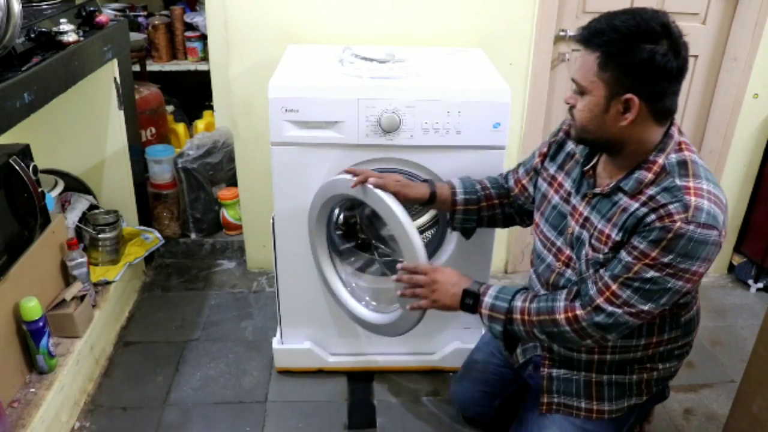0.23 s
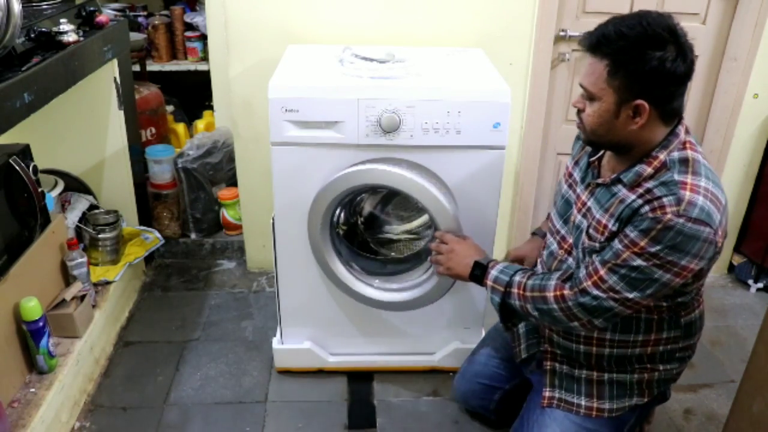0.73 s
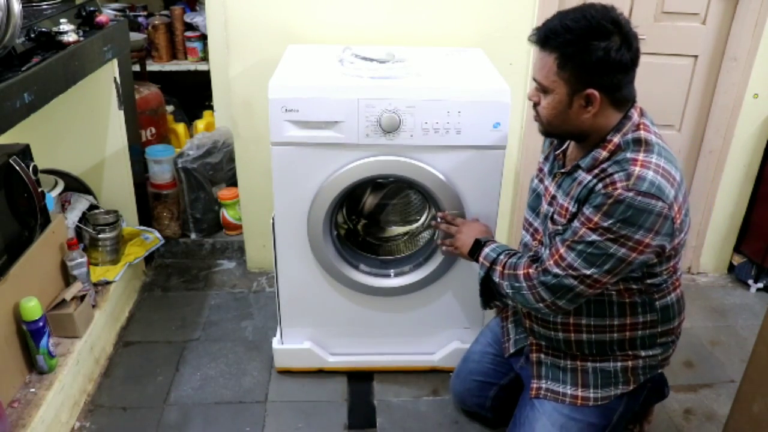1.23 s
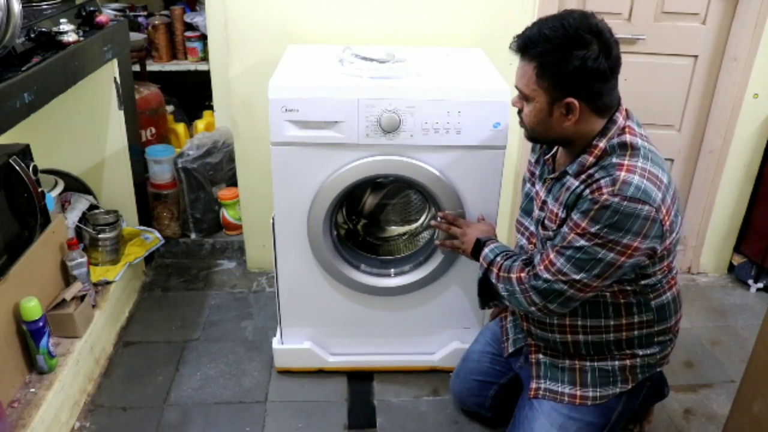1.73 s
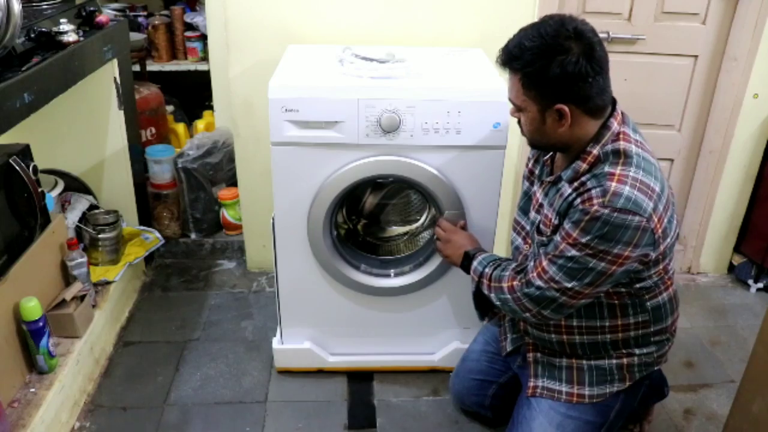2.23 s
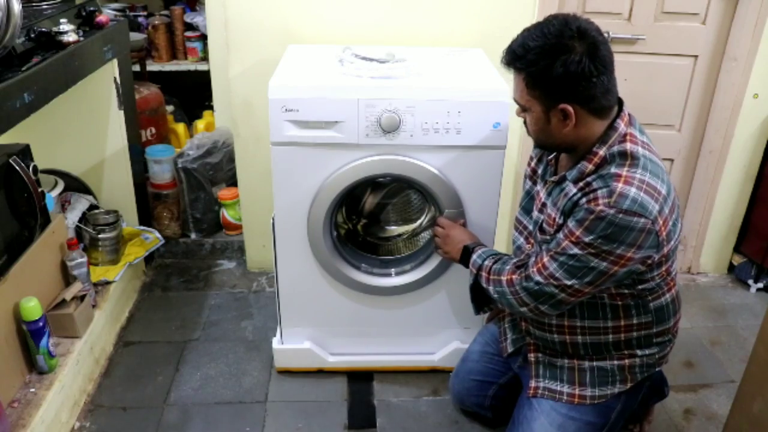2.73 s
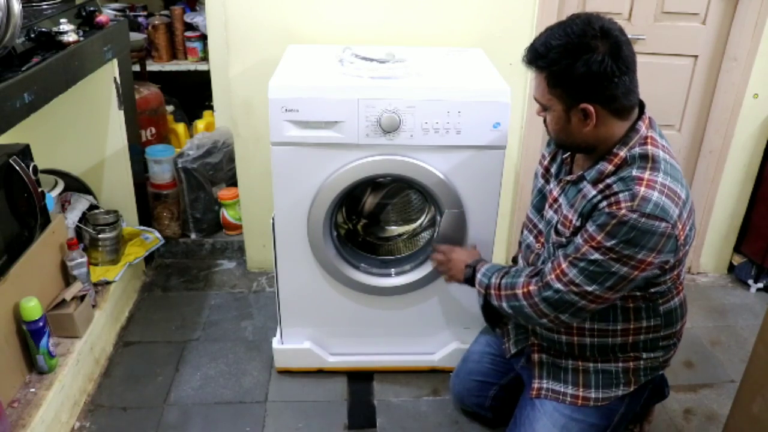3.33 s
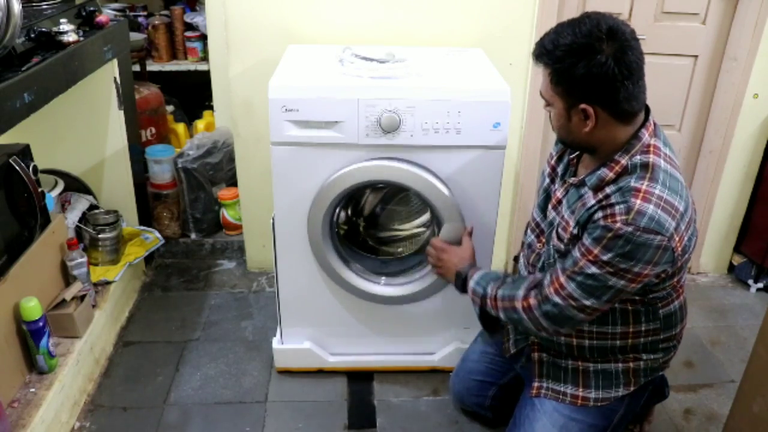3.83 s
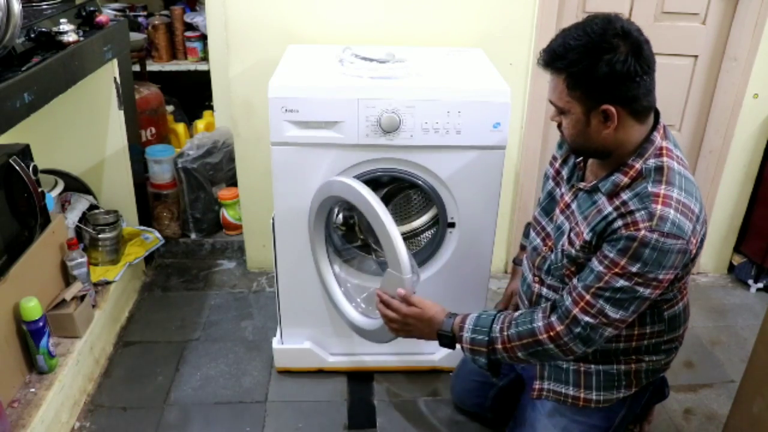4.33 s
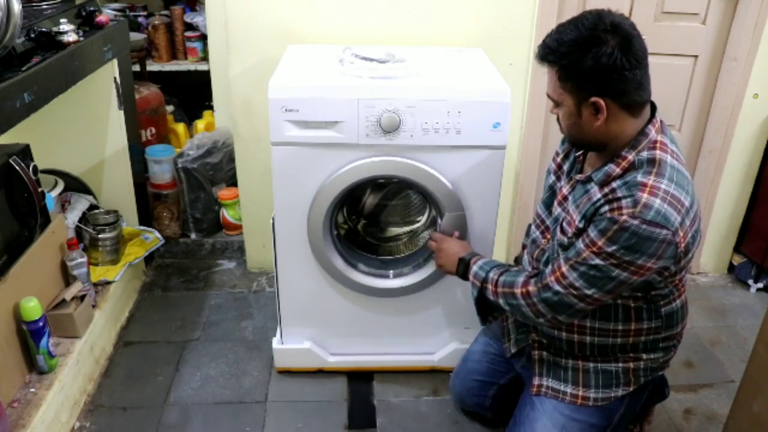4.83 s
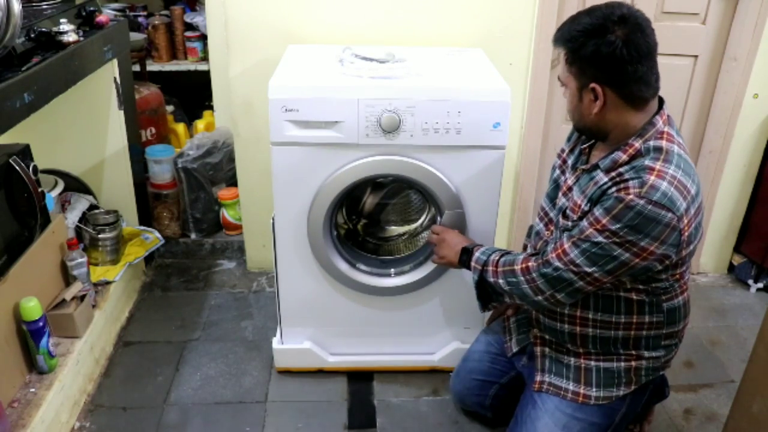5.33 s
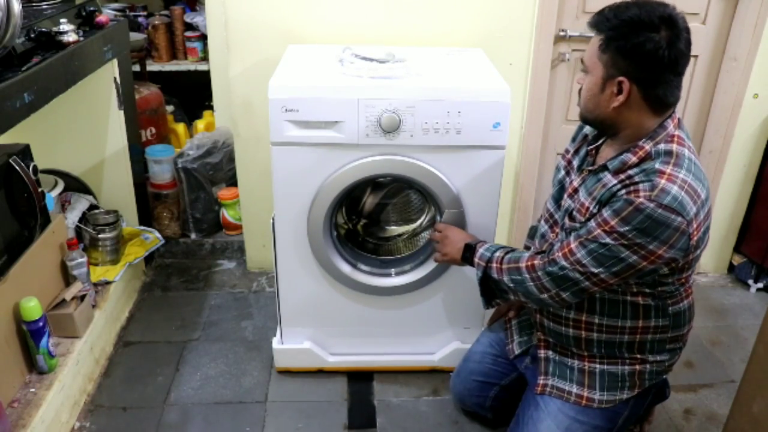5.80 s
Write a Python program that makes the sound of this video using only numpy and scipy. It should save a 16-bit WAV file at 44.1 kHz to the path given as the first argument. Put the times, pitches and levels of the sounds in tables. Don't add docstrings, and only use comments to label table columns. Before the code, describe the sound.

A small hard room with low rumble and faint microphone hiss. For the first second only soft sleeve rustle and hand rubbing on plastic are heard. At 1.15 s the door knocks firmly on its catch, with a short hollow ring and shudder; a dull faint touch follows at 1.5. Tiny nail clicks run from 1.75 to 2.05, then a clearer handle-spring click at 2.1. At 2.5 a quick rattle ends in a loud, hard latch snap, the cabinet ringing and the room answering. It is quiet until a spring click at 3.7, then at 3.85 the rubber seal peels loose with a stepped, low drum boom. Rubbing continues while five dull taps sound further off, evenly from 4.05 to 4.87. A firm knock at 5.0, a brief bright creak, another sharp latch snap at 5.52, a faint motor-like hum low down, and a light handle click at 5.87.

```python
import sys
import numpy as np
from scipy import signal
from scipy.fft import rfft, irfft
from scipy.io import wavfile
from scipy.ndimage import uniform_filter1d

SR = 44100
rng = np.random.default_rng(int(sys.argv[2]) if len(sys.argv) > 2 else 0)


def transcribe(signal):
    frames = np.atleast_2d(signal).T
    limited = np.clip(frames, -1, 1)
    pcm = np.round(limited * 32767).astype(np.int16)
    wavfile.write(sys.argv[1], SR, pcm)


def volts_from_db(level):
    exponent = np.asarray(level, float) / 20
    return 10 ** exponent


N = 267334


def latch():
    # start in s, peak in dB, rattle length in ms, hardness in dB per octave, weight in dB per octave
    snaps = [
        (2.498, -40.5, 12, -7, 8.5),
        (2.517, -24.5, 8.7, 0.5, -0.2),
        (2.525, -18, 5.2, 6.5, -3),
        (2.528, -14.5, 3.7, 4, -8.5),
        (2.5323, -7, 0.3, 0.5, 1.6),
        (5.498, -49, 9.0, -2, 3),
        (5.513, -27, 3.5, 0.5, 4.5),
        (5.5215, -15.5, 0.96, 4, 3),
        (5.5245, -10.5, 2.5, 5.5, -5),
        (5.5286, -7, 0.3, 0, 1.6),
    ]
    # frequency in Hz, density in dB per Hz
    spectrum = [(59, -20), (100, -10.5), (287, -21.5), (429, -1), (564, -10), (843, 2.5), (1020, -10.5),
                (1760, -6), (8770, -36.5), (15500, -50)]
    # frequency in Hz, level in dB, T60 in s
    modes = [(68.4, -11.5, 0.21), (146, -9, .2), (222, -6, 0.12), (445, -6, 0.12), (630, -4.5, 0.097),
             (848, 1, 0.1), (1255, 11, 0.035), (1980, 0, .04), (3450, -1, 0.034), (8430, -6.5, 0.026)]
    return hits(snaps, spectrum, modes, ring_db=-10, grain_db=2.5, trim_db=0.0, wet_db=.5, rise_ms=3.0,
                ring_wet_db=-8)


def knock():
    # start in s, peak in dB, rattle length in ms, hardness in dB per octave, weight in dB per octave
    touches = [
        (1.1485, -26, 5.3, -0.5, 1),
        (1.54, -48.5, 2.5, -22, -5),
        (2.921, -63, 2.1, .3, 10),
        (4.989, -26.5, 8.2, 0, -1),
    ]
    # frequency in Hz, density in dB per Hz
    spectrum = [(59, -32), (100, -19.5), (549, -8.5), (619, -16.5), (1220, -2), (1350, -3), (1460, -2),
                (3260, -27), (12000, -54), (15600, -70), (22000, -120)]
    # frequency in Hz, level in dB, T60 in s
    modes = [(150, -2.5, 0.5), (468, -6.5, 0.18), (955, 14, 0.07), (1298, -3, 0.1), (1512, -39.5, 0.24),
             (2004, 7, 0.13), (3800, 9, 0.012)]
    return hits(touches, spectrum, modes, ring_db=-8.5, grain_db=-5.0, trim_db=1.5, wet_db=-3.5, rise_ms=5.8)


def seal():
    # start in s, peak in dB, rattle length in ms, hardness in dB per octave, weight in dB per octave
    steps = [
        (3.835, -24, 11.3, -1.5, -1.7),
        (3.853, -17.5, 4.7, -3.9, -0.4),
        (3.874, -23.5, 9.6, 2, 4.5),
        (3.89, -22.5, 5.6, 1, 2.9),
        (3.951, -35.5, 8.7, -6, 5),
    ]
    # frequency in Hz, density in dB per Hz
    spectrum = [(18, -60), (30, -13), (122, -19), (146, -9), (173, -3.5), (259, -2), (377, -8), (428, -13),
                (800, -16), (1050, -13), (1500, -22), (3980, -31), (12000, -43), (15600, -83),
                (22000, -120)]
    # frequency in Hz, level in dB, T60 in s
    modes = [(68, -20, .2), (150, 10, 0.091), (174, 11, 0.13), (222, -18, .1), (263, 4, 0.12),
             (310, -2, .1), (457, -7, 0.1)]
    return hits(steps, spectrum, modes, ring_db=-2.5, grain_db=3.0, trim_db=-4.0, wet_db=-0.5, rise_ms=6.6)


def click():
    # start in s, peak in dB, rattle length in ms, hardness in dB per octave, weight in dB per octave
    contacts = [
        (1.758, -52, 2.2, -3, 1),
        (1.797, -54, 1.5, 3, -6),
        (1.882, -48, 1.5, 2, 5),
        (1.984, -55, 5.3, 0, 4),
        (2.04, -53, 2.5, 7.5, -11),
        (2.095, -33, 2.7, -3, -4),
        (3.7065, -35.5, 4.0, -0.2, 1.5),
        (5.8745, -42, 3, 3, -7),
    ]
    # frequency in Hz, density in dB per Hz
    spectrum = [(120, -33), (200, -3.5), (609, -8.5), (1230, -4), (2090, -14.5), (3000, -12), (3560, -25),
                (3940, -13.5), (12000, -35), (15600, -62.5), (22000, -120)]
    # frequency in Hz, level in dB, T60 in s
    modes = [(800, -12, .04), (1276, 5, 0.075), (1700, -6, 0.044), (3080, -2, 0.04), (4500, -2, .025)]
    return hits(contacts, spectrum, modes, ring_db=-12, grain_db=5.3, trim_db=-1.5, wet_db=1.5, rise_ms=2.5)


def hits(events, spectrum, modes, ring_db, grain_db, trim_db, wet_db, rise_ms, ring_wet_db=-6):
    out = np.zeros(N + 2 * SR)
    t = np.arange(SR // 3) / SR
    for start, db, ms, hard_db, weight_db in events:
        swell = np.sqrt(t * 1000 / ms) * np.exp(-t * 1000 / ms)
        rattle = rng.standard_normal(len(t)) * volts_from_db(grain_db * rng.exponential(size=len(t))) * swell

        def tilt(hz):
            brightness = hard_db * np.log2(np.clip(hz, 1200, 9000) / 1200)
            return brightness - weight_db * np.log2(np.clip(hz, 200, 900) / 900)

        shape = [(hz, gain + tilt(hz)) for hz, gain in spectrum]
        ring = np.zeros(len(t))
        for hz, gain, t60 in modes:
            detune = 1 + 0.0033 * rng.standard_normal()
            ring += volts_from_db(gain + tilt(hz)) * np.sin(2 * np.pi * hz * detune * t) * 1000. ** (-t / t60)
        ring *= volts_from_db(ring_db) / np.abs(ring).max()
        energy = 7 * ms + 5
        crack = colour(rattle, shape)
        crack *= np.sqrt(energy / np.sum(crack ** 2))
        push = colour(1. * (t == 0), shape)
        push *= np.sqrt(energy / np.sum(push ** 2))
        hit = volts_from_db(wet_db) * signal.fftconvolve(push + volts_from_db(ring_wet_db) * ring, reflections(rise_ms))
        hit[:len(t)] += crack + ring
        out[int(start * SR):][:len(hit)] += volts_from_db(db + trim_db) * hit
    return out[:N]


def creaks():
    # start in s, length in s, level in dB, lower ring in Hz, upper over lower ring in dB
    slides = [
        (0.844, .11, -70, 520, -6),
        (1.167, 0.098, -52.5, 150, -12),
        (1.993, .1, -66.5, 850, 0),
        (1.579, 0.14, -68.5, 1020, -12),
        (2.375, 0.11, -63, 555, -0.5),
        (3.589, .07, -62, 820, -5),
        (5.157, .05, -59, 560, 9.5),
        (1.41, .09, -68, 560, 3),
    ]
    out = np.zeros(N)
    for start, length, db, low_hz, high_db in slides:
        high_hz = 2.1 * low_hz
        t = np.arange(int(length * SR)) / (length * SR)
        grains = rng.standard_normal(SR // 2) * volts_from_db(2.9 * rng.exponential(size=SR // 2))
        slips = grains[:len(t)] * np.minimum(t / 0.11, 1) * (1 - t) ** 0.33
        lower = band(slips, low_hz * .88, low_hz * 1.12)
        upper = volts_from_db(high_db) * band(slips, high_hz * .92, high_hz * 1.08)
        between = 0.18 * band(slips, low_hz * 0.64, high_hz * 1.5)
        out[int(start * SR):][:len(t)] += level(lower + upper + between, db)
    return out + volts_from_db(-10) * signal.fftconvolve(out, reflections(rise_ms=5.7))[:N]


def sleeves():
    # start in s, level in dB, rise in s per 20 dB, hold in s, fall in s per 20 dB
    rustles = [(0.0, -60, .05, .01, .55), (.424, -57, .2, .01, .13), (.692, -67.5, .3, .01, .16),
               (.9, -74, .3, .1, .8), (1.538, -70.5, .02, .01, .3), (2.048, -62.5, .05, .01, .05),
               (2.108, -62, .03, .01, .25), (3.066, -60.5, .09, .01, .15), (3.6, -64, .025, .01, .12),
               (3.7, -65, .03, .01, .06), (3.95, -63, .03, .33, .16), (4.7, -76, .06, .14, .12),
               (5.876, -75, .04, .01, .25)]
    # frequency in Hz, density in dB per Hz
    spectrum = [(880, -38), (1500, -2.5), (2330, -5), (2860, -3), (3380, -3), (8620, -3), (11100, -9.5),
                (13800, -5.5), (15500, -9.5)]
    grains = rng.standard_normal(N) * volts_from_db(0.51 * rng.exponential(size=N) + 0.67 * walk(30.47))
    return level(colour(grains, spectrum), -0.9) * strokes(rustles)


def skin():
    # start in s, level in dB, rise in s per 20 dB, hold in s, fall in s per 20 dB
    rubs = [(.128, -67, .36, .01, .4), (.424, -66, .3, .01, .8), (.88, -64, .15, .03, .1),
            (1.35, -70, .05, .1, .6), (1.538, -66, .015, .01, 1.1), (2.048, -61.5, .12, .01, .07),
            (2.1, -57, .01, .01, .3), (2.976, -63.5, .3, .01, .04), (3.066, -65, .05, .01, .11),
            (3.6, -62, .03, .1, .06), (3.95, -56, .02, .1, .4), (4.2, -61, .1, .05, .1),
            (4.27, -54, .03, .03, .16), (4.47, -59, .03, .01, .22), (4.678, -64, .02, .01, .18),
            (4.884, -65, .03, .01, .24), (5.172, -59, .06, .01, .18), (5.48, -65, .25, .01, .04),
            (5.876, -60, .012, .01, .12)]
    rub = band(rng.standard_normal(N), 390, 2440) * volts_from_db(2.7 * walk(40))
    return level(rub, -1.5) * strokes(rubs)


def taps():
    # start in s, peak in dB, rattle length in ms, hardness in dB per octave, weight in dB per octave
    blows = [
        (4.053, -37.5, 1.4, -2, -1.5),
        (4.262, -35.5, 1.3, -1, -1),
        (4.468, -37.5, 1.7, -1, -3.5),
        (4.672, -37.5, 1.1, 0.3, -2),
        (4.87, -40.5, 1.2, -11, -6),
    ]
    # frequency in Hz, density in dB per Hz
    spectrum = [(150, -40), (250, -9), (393, 8), (579, 0.5), (763, -3), (898, -11.5), (1030, -17),
                (1640, -15), (2360, -19), (5000, -34), (6500, -63), (11000, -120)]
    # frequency in Hz, level in dB, T60 in s
    modes = [(378, 3, 0.039), (470, -4, .025), (592, -7.5, 0.094), (900, -8.5, .06), (1600, -17, 0.082)]
    return hits(blows, spectrum, modes, ring_db=0, grain_db=0.0, trim_db=-3, wet_db=3, rise_ms=23.0,
                ring_wet_db=-4.5)


def rumble():
    # time in s, level in dB
    swells = [(0.0, -73), (.3, -74), (.6, -70), (.91, -75), (1.48, -67), (2.0, -67), (2.4, -63), (2.9, -63),
              (3.2, -69), (3.55, -68), (4.25, -61.5), (4.62, -69), (4.9, -67), (5.2, -59), (5.7, -64),
              (6.06, -65)]
    # start in s, deep shudder in dB, low shudder in dB
    shakes = [
        (1.2, -63, -67),
        (2.57, -41, -55),
        (3.68, -58, -64),
        (3.88, -60, -56),
        (5.05, -59, -58),
        (5.6, -55, -54),
    ]
    # start in s, level in dB, rise in s per 20 dB, hold in s, fall in s per 20 dB
    drones = [
        (4.95, -59, .6, .4, 1.5),
        (5.6, -63, .3, .5, .3),
    ]
    swell_db = np.interp(np.arange(N) / SR, *np.transpose(swells))
    deep_shudder = strokes([(start, db, .1, 0, .12) for start, db, _ in shakes])
    low_shudder = strokes([(start, db, .1, 0, .3) for start, _, db in shakes])
    deep_gain = np.hypot(volts_from_db(-68 + 1.1 * (swell_db + 65)), deep_shudder)
    low_gain = np.hypot(volts_from_db(swell_db), low_shudder)
    noise = rng.standard_normal((3, N))
    deep = level(band(noise[0], 56.5, 85), -0.63) * deep_gain * volts_from_db(0.83 * walk(3.2))
    hum = level(band(noise[1], 140.3, 171), -4)
    low = hum + level(band(noise[2], 73, 310), -3.0)
    return deep + low * low_gain * volts_from_db(2 * walk(14)) + hum * strokes(drones)


def seep():
    # time in s, level in dB
    leak = [(.9, -90), (1.1, -72.5), (2.0, -73), (2.2, -90)]
    hiss = level(band(rng.standard_normal(N), 6900, 12000), -0.61)
    return hiss * volts_from_db(np.interp(np.arange(N) / SR, *np.transpose(leak)))


def microphone(air):
    # frequency in Hz, density in dB per Hz
    common = [(12, -40), (20, -8.5), (161, -9), (232, -15), (465, -12), (614, -15.5), (686, -15),
              (1070, -15.5), (1670, -19.5), (1820, -18), (2270, -20.5), (14300, -23), (15500, -23.5)]
    # frequency in Hz, density in dB per Hz
    opposite = [(18, -30), (30, 2), (1230, -2.5), (3590, -1), (13600, -3), (15500, -2)]
    hiss = level(colour(rng.standard_normal(N), common), -64.5)
    side = level(colour(rng.standard_normal(N), opposite), -66)
    port_hz, width_hz = 8720, 2540
    port = volts_from_db(-6.5) * band(air, port_hz - width_hz / 2, port_hz + width_hz / 2)
    mid = air + port + hiss
    return np.array([mid + side, mid - side])


def reflections(rise_ms):
    # frequency in Hz, T60 in s
    decay = [(60, 0.49), (250, 0.49), (1000, 0.35), (4000, 0.43), (12000, 0.23)]
    t = np.arange(SR * 5 // 8) / SR
    hz, t60 = np.transpose(decay)
    centres = 14000 / 2. ** np.arange(9)[:, None]
    octave = np.log2(np.fft.rfftfreq(len(t), 1 / SR) + 1) - np.log2(centres)
    windows = np.cos(np.pi / 2 * np.clip(octave, -1, 1)) ** 2
    bands = irfft(rfft(rng.standard_normal(len(t))) * windows, len(t))
    fading = 1000. ** (-t / np.interp(np.log(centres), np.log(hz), t60))
    tail = np.sum(bands * fading, axis=0) * (1 - np.exp(-t * 1000 / rise_ms))
    return tail / np.sqrt(np.sum(tail ** 2))


def strokes(rows):
    t = np.arange(N) / SR
    power = np.zeros(N)
    for start, db, rise, hold, fall in rows:
        away = np.maximum((start - t) / rise, (t - start - hold) / fall)
        power += volts_from_db(db - 20 * np.maximum(away, 0)) ** 2
    return np.sqrt(power)


def level(x, db):
    return x * volts_from_db(db) / np.sqrt(np.mean(x ** 2))


def colour(x, points):
    hz, db = np.transpose(points)
    size = 4096
    gain = np.interp(np.log(np.fft.rfftfreq(size, 1 / SR) + 1), np.log(hz), db) * np.log(10) / 20
    ceps = irfft(gain)
    ceps[1:size // 2] *= 2
    ceps[size // 2 + 1:] = 0
    response = irfft(np.exp(rfft(ceps)))[:size // 2]
    return signal.fftconvolve(x, response)[:len(x)]


def band(x, lo_hz, hi_hz):
    return signal.sosfilt(signal.butter(2, [lo_hz, hi_hz], "bandpass", fs=SR, output="sos"), x)


def walk(rate):
    k = int(SR / rate)
    held = np.repeat(rng.standard_normal(N // k + 1), k)
    return 1.76 * uniform_filter1d(uniform_filter1d(held, k), k)[:N]


def scene():
    door = latch() + knock() + click() + seal()
    hands = creaks() + sleeves() + skin()
    return microphone(door + hands + taps() + rumble() + seep())


def band_limit(x):
    return signal.sosfilt(signal.butter(12, 16640, fs=SR, output="sos"), x)


def record(dry):
    bass_cut = signal.butter(2, 40, "highpass", fs=SR, output="sos")
    top_cut = signal.ellip(8, .2, 50, 15550, fs=SR, output="sos")
    mix = signal.sosfilt(np.vstack([bass_cut, top_cut]), dry)
    return band_limit(mix)


dry = scene()
out = record(dry)
transcribe(out)
```